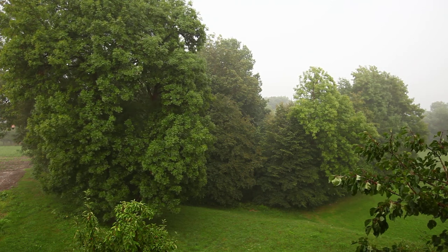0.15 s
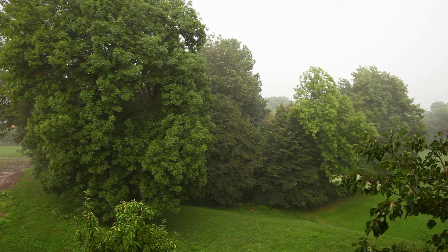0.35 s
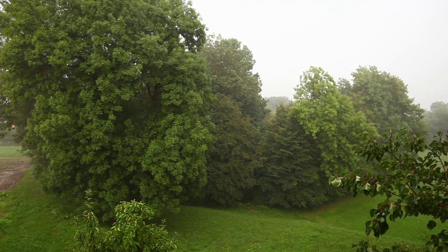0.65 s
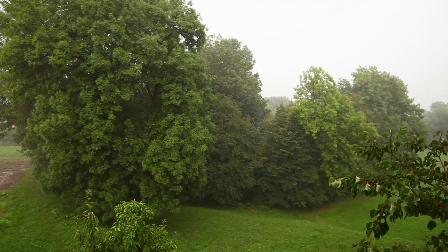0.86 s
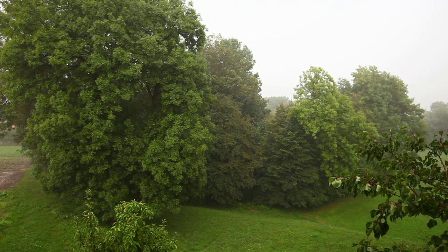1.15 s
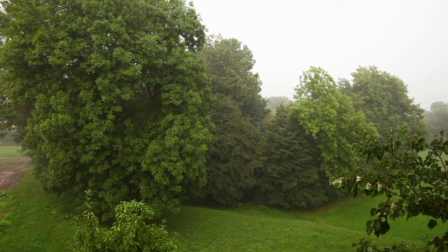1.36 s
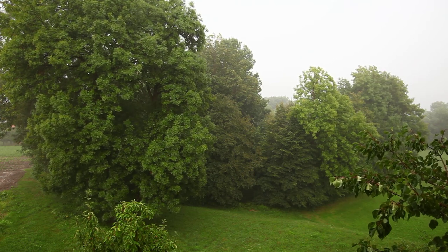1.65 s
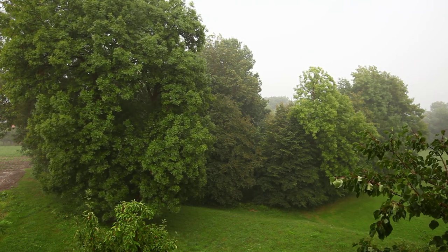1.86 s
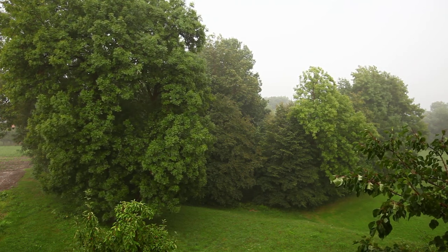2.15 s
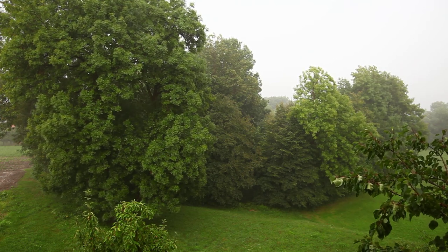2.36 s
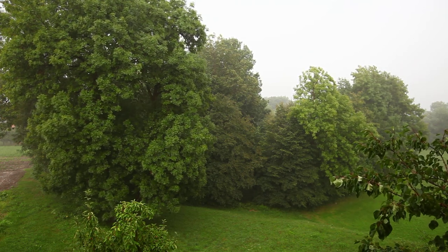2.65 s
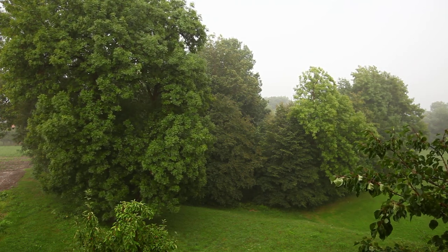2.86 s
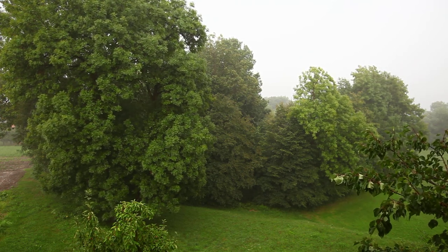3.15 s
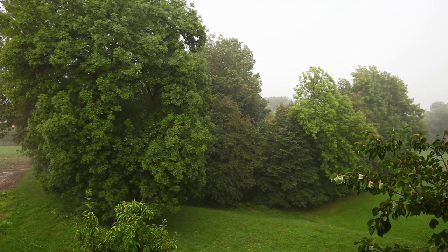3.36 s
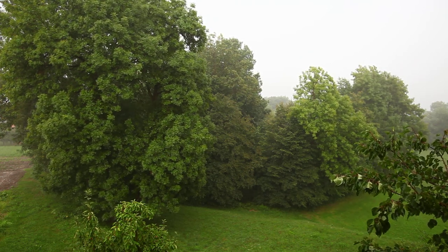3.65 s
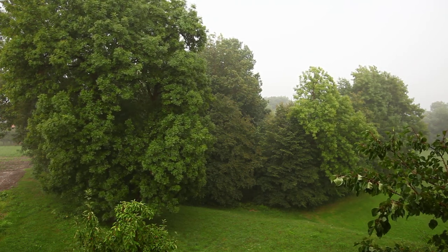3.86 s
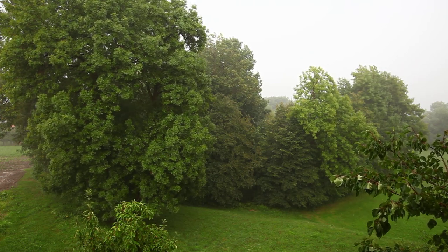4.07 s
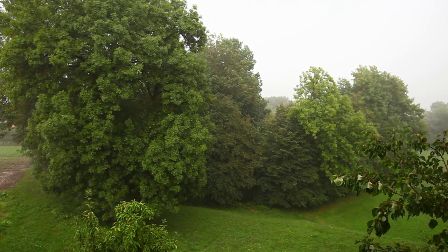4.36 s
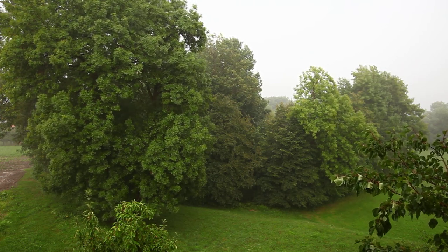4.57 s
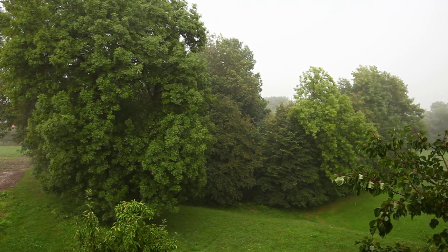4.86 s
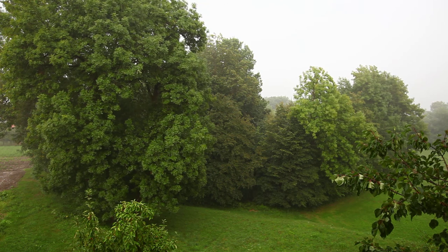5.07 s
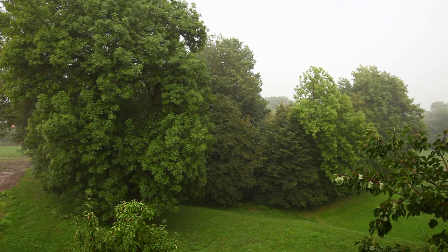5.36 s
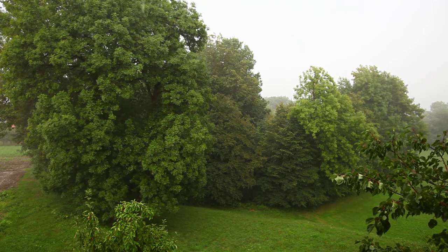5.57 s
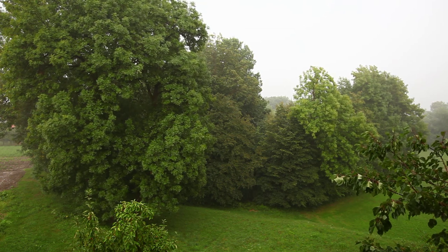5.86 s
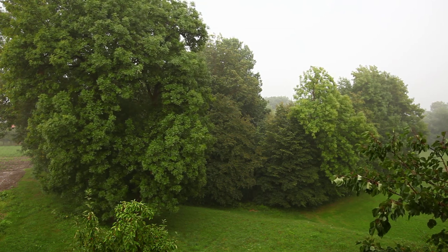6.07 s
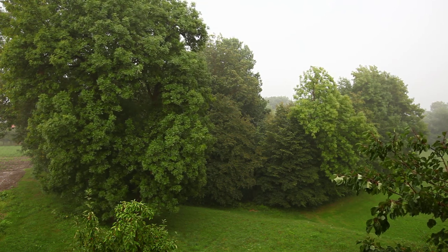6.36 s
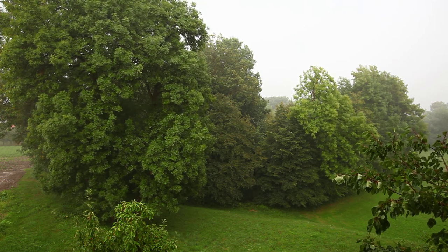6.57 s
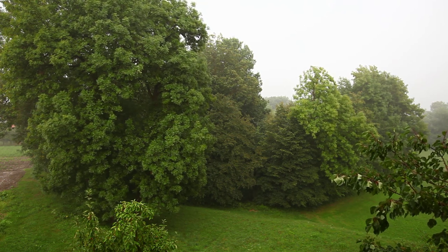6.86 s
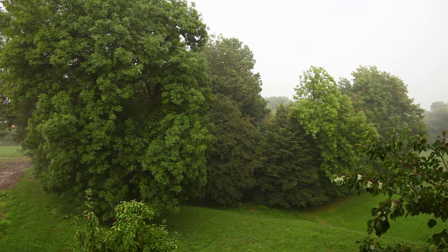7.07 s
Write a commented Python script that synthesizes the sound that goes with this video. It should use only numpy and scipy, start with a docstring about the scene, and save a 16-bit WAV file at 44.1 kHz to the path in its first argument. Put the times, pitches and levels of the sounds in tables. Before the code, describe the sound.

Continuous rain in a leafy park, heard from under shelter, centred with no stereo width. Broad drifting hiss from far drops, crisp pattering on nearer foliage. One close drip splats early, then a very loud ringing smack with spray right at the microphone makes the level duck and recover. More leaf drips follow irregularly, some in quick clusters, with light low wind flutters and one strong soft thump in the middle.

```python
"""A steady downpour on trees and grass, taken from a sheltered spot, alike in both channels.
Throughout, far drops merge into a drifting hiss while nearer ones patter on leaves as pitched noise bursts.
A first fat drip splats close by and light gusts of low noise reach the microphone. Just before one second
a drip rings and sprays right beside it: the gain control ducks deeply, then the rain swells back.
More close drips follow, the loud ones ducking it a little; eddies bump the microphone, hardest near 3.9 s."""
import sys
import numpy as np
from scipy import signal
from scipy.fft import rfft, irfft
from scipy.io import wavfile
from scipy.ndimage import uniform_filter1d

SR = 44100
rng = np.random.default_rng(int(sys.argv[2]) if len(sys.argv) > 2 else 0)


def output_pcm(signal):
    """Save a mono or channel-first signal as 16-bit PCM at the path in sys.argv[1].

    Samples are clipped to [-1, 1] before scaling.
    """
    pcm = np.clip(np.atleast_2d(signal).T, -1, 1) * 32767
    wavfile.write(sys.argv[1], SR, np.round(pcm).astype(np.int16))


N = 317520
TIME = np.arange(N) / SR

# colour of the rain, far and near: f/Hz, relative level/dB per Hz
RAIN_COLOUR = [(25, -16), (50, -7.5), (110, -5.5), (200, -2), (330, -2.5), (520, -4), (720, -0.5),
               (1700, 0.5), (2900, -2), (6000, -1.5), (7700, -3.5), (10000, -16.5), (12500, -26.5),
               (15600, -33)]


def wash(patchy_db=0.64, flicker_db=0.43):
    """Far rain: countless drops merge into a smooth hiss with small drifting patches in time and pitch."""
    frames = N // 128 + 5
    real, imaginary, patches = rng.standard_normal((3, frames, 257))
    patches = uniform_filter1d(patches, size=14, axis=0)  # along time
    patches = evened(uniform_filter1d(patches, size=22, axis=1))  # along frequency
    flicker = evened(uniform_filter1d(rng.standard_normal(frames), size=16))[:, None]
    field = (real + 1j * imaginary) * gain_of(patchy_db * patches + flicker_db * flicker)
    _, hiss = signal.istft(field.T, nperseg=512, noverlap=384)
    return coloured(hiss[:N], RAIN_COLOUR)


def patter(per_s=650, spread_db=2.5, low_hz=2000, high_hz=14500, count=48):
    """Nearer rain: each leaf has its own pitch and is hit at random by drops of all sizes."""
    out = np.zeros(N)
    for hz in np.linspace(low_hz, high_hz, count):
        sizes = gain_of(spread_db * np.minimum(rng.exponential(1, N), 4))
        hits = sizes * (rng.random(N) < per_s / count / SR)
        leaf = splat(hz, t60=0.076, sharpness=2.3, slap_s=0.0023, spray_db=-1)
        out += signal.oaconvolve(hits, evened(leaf))[:N]
    return coloured(out, RAIN_COLOUR)


# fat drips on near leaves: t/s, level of the first 12 ms before dulling/dB, f of the splat/Hz,
# sharpness/Q (at least 1 is played), t60 of the spray/s
NEAR_DRIPS = [(.4154, -23, 5000, 2, .06), (1.311, -20, 5600, 3.4, 0.091), (1.5787, -27, 7500, 2, .09),
              (1.767, -16.5, 5300, 12, .07), (2.8133, -19, 7300, 2.8, 0.58), (2.841, -20, 4300, 0.85, 0.22),
              (2.9736, -18.5, 5000, 2.5, 0.045), (3.323, -18, 5800, 1.7, 0.17),
              (3.558, -18.5, 3800, 2.6, 0.23), (4.302, -27, 2500, 7, .08), (4.6934, -19, 2920, 3.5, 0.12),
              (4.9024, -21, 6100, 3.6, .07), (4.935, -22.5, 2580, 4, .05), (5.031, -20, 7500, 2.6, 0.2),
              (5.361, -18, 2900, 2.4, 0.11), (5.441, -18.5, 2300, 1.8, 0.087),
              (6.0545, -20.5, 2500, 2.7, .08), (6.087, -20.5, 5400, 4, .05), (6.123, -21.5, 5100, 2.2, .07),
              (6.352, -21, 4600, 4, 0.11), (6.705, -21.5, 8200, 2.2, .16), (6.7685, -20, 6000, 5, .08),
              (6.848, -22, 3600, 3, .07)]


def drips(level_db=0, dull_hz=8900, slap_s=0.0053, spray_db=-7):
    """Fat drips from the nearest branches splat on leaves; they carry little top treble."""
    out = np.zeros(N)
    onset = round(.012 * SR)
    for s, db, hz, sharpness, t60 in NEAR_DRIPS:
        drop = splat(hz, t60, sharpness, slap_s, spray_db)
        add(out, s, gain_of(db + level_db) * drop / drop[:onset].std())
    return low_pass(out, dull_hz, order=8)


def splat(hz, t60, sharpness, slap_s, spray_db):
    """A drop on a leaf: a brief slap, then fine spray, both through one broad resonance; peak 1."""
    t = np.arange(4096) / SR  # a longer spray is cut off here, at 93 ms
    slap = np.exp(-t / slap_s)
    spray = gain_of(spray_db - 60 * t / max(t60, .005))
    b, a = signal.iirpeak(min(hz, .4 * SR), max(sharpness, 1), fs=SR)
    sound = signal.lfilter(b, a, (slap + spray) * rng.standard_normal(len(t)))
    return sound / abs(sound).max()


# the drip beside the microphone: t/s, peak level of its ring/dB
SMACK_S, SMACK_DB = .9274, 2.9
# what that drip rings: f/Hz, relative level/dB, t60/s
LEDGE_RING = [(3140, 11, 0.016), (3600, 0, 0.025), (4530, 10, 0.013), (5300, -15, .01), (7700, -1, .035)]


def smack(splash_db=-4):
    """One drip hits a hard ledge beside the microphone, rings it briefly and bursts into spray."""
    out = np.zeros(N)
    t = np.arange(SR // 10) / SR
    ring = sum(gain_of(db - 60 * t / t60) * np.sin(2 * np.pi * hz * t) for hz, db, t60 in LEDGE_RING)
    add(out, SMACK_S, gain_of(SMACK_DB) * ring / abs(ring).max())
    splash = splat(4000, t60=.06, sharpness=1.5, slap_s=0.0033, spray_db=-8)
    add(out, SMACK_S, gain_of(splash_db) * low_pass(splash, 8900, order=8))
    return out


# colour of the wind at the microphone: f/Hz, relative level/dB per Hz
WIND_COLOUR = [(15, -28), (40, -8), (80, -1.5), (170, -8.5), (300, -16.5), (600, -32), (2000, -70)]
# single eddies that bump the microphone: t/s, approximate peak level/dB, f setting the speed of the swing/Hz
EDDIES = [(.737, -28, 70), (2.548, -11.5, 107), (2.942, -20, 90), (3.356, -14, 141), (3.866, -18, 90),
          (3.917, -14, 129), (3.9343, -0.5, 218), (3.9762, -13, 105), (4.337, -13, 116), (4.598, -16, 130)]


def wind(level_db=-1, lumpy_db=3.0, lean=0.39):
    """Lumpy low turbulence, and single eddies as a short push and pull of pressure."""
    lumps = evened(uniform_filter1d(rng.standard_normal(N), size=1500))
    turbulence = coloured(rng.standard_normal(N) * gain_of(lumpy_db * lumps), WIND_COLOUR)
    out = gusts() * gain_of(level_db) * turbulence
    t = np.arange(SR // 20) / SR
    middle = t.mean()
    for s, db, hz in EDDIES:
        passing = np.pi * hz * (t - middle)
        # pressure peaks as the eddy passes; lean (radians) deepens the suction on one side of the peak
        swing = (np.exp(1j * lean) / (1 - 1j * passing) ** 3).real
        add(out, s - middle, gain_of(db) * swing)
    return out


# gusts on the microphone: t of the height/s, level before the wind's trim/dB, length between 1/e of power/s
GUST_SWELLS = [(0.263, -32, 0.089), (.35, -37, .7), (0.773, -28.5, 0.21), (2.613, -33, .08),
               (3.08, -35, .4), (3.382, -24.5, 0.072), (3.954, -33, 0.35), (4.33, -33, .1),
               (4.603, -32, 0.12), (4.8, -38, 0.39)]
BREEZE_DB = -47  # the faint wind between gusts, before the same trim


def gusts():
    """Strength of the wind: each gust swells and dies away as a bell curve over a faint steady breeze."""
    power = sum(gain_of(db) ** 2 * np.exp(-(2 * (TIME - s) / length) ** 2) for s, db, length in GUST_SWELLS)
    return np.sqrt(gain_of(BREEZE_DB) ** 2 + power)


def gain_of(db):
    """Decibels to amplitude."""
    return 10 ** (np.asarray(db) / 20)


def evened(x):
    """Scales to rms 1."""
    return x / np.sqrt(np.mean(x ** 2) + 1e-20)


def read(points, hz):
    """Reads a spectrum along a log-frequency axis."""
    f, value = np.transpose(points)
    return np.interp(np.log(hz + 1), np.log(f + 1), value)


def follow(curve):
    """A level curve as a gain for every sample."""
    return gain_of(np.interp(TIME, *np.transpose(curve)))


def coloured(x, spectrum):
    """Filters x by a spectrum, then scales to rms 1."""
    gains = gain_of(read(spectrum, np.fft.rfftfreq(N, 1 / SR)))
    return evened(irfft(rfft(x) * gains, N))


def add(mix, s, sound):
    """Mixes a sound in at time s."""
    part = mix[max(round(s * SR), 0):][:len(sound)]
    part += sound[:len(part)]


def low_pass(x, hz, order):
    """Takes off what lies above hz."""
    return signal.sosfilt(signal.butter(order, min(hz, .45 * SR), fs=SR, output="sos"), x)


def lagged(x, lag_s):
    """Follows x with a time constant."""
    keep = np.exp(-1 / (lag_s * SR))
    return signal.lfilter([1 - keep], [1, -keep], x)


# slow drift in the strength of the rain, far and near together: t/s, level before each layer's trim/dB
SHOWER_DRIFT = [(0, -20), (.8, -18.5), (1.05, -19), (3.15, -21.5), (3.7, -19), (4.05, -21.5), (4.7, -18.5),
                (5.6, -21), (6.05, -20), (7.2, -20.5)]


def scene(wash_db=-0.14, patter_db=-7):
    """The rain rises and falls as one; all sources reach both channels alike."""
    layers = gain_of(wash_db) * wash() + gain_of(patter_db) * patter()
    rain = follow(SHOWER_DRIFT) * layers
    mono = rain + drips() + smack() + wind()
    return np.array([mono, mono])


EDGE_HZ = 15750  # upper band limit


def record(dry, threshold_db=-18.0, share=1.0, sense_hz=900, sense_s=0.0045, recovery_s=0.25, attack_s=0.013):
    """Gain control ducks when the treble jumps and creeps back; full scale clips; then the band limit."""
    sensed = dry[0] - low_pass(dry[0], sense_hz, order=1)
    level_db = 10 * np.log10(lagged(sensed ** 2, sense_s) + 1e-12)
    over_db = share * np.maximum(level_db - threshold_db, 0)
    fading = np.exp(-TIME / max(recovery_s, .05))
    # each duck dies away until a deeper one takes over
    held_db = np.maximum.accumulate(over_db / fading) * fading
    ducked = np.clip(dry * gain_of(-lagged(held_db, attack_s)), -1, 1)
    edge = signal.firwin(511, EDGE_HZ, window=("kaiser", 9), fs=SR)
    return signal.oaconvolve(ducked, edge[None], "same")


dry = scene()
out = record(dry)
output_pcm(out)
```